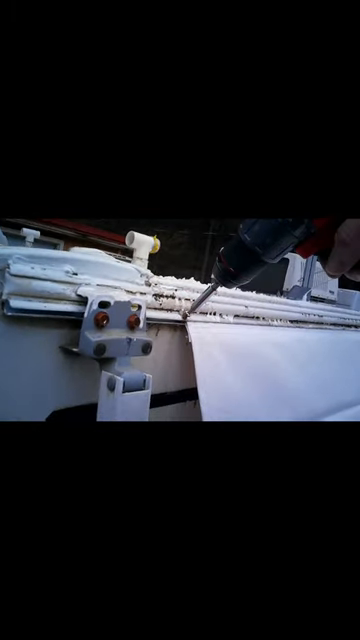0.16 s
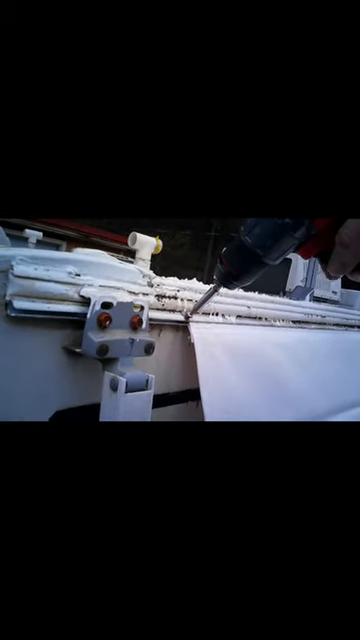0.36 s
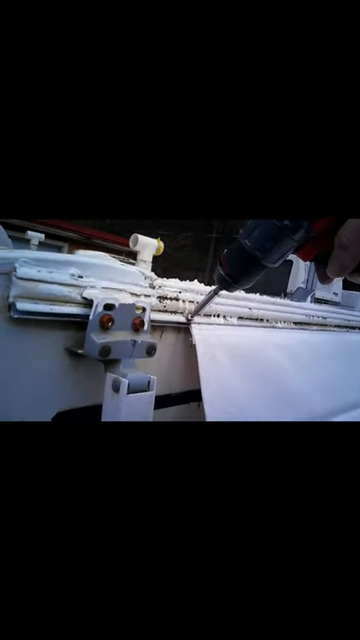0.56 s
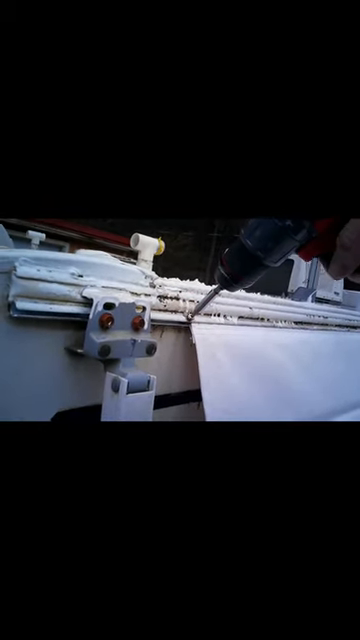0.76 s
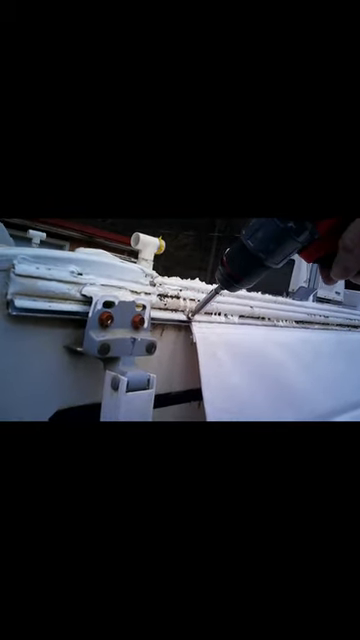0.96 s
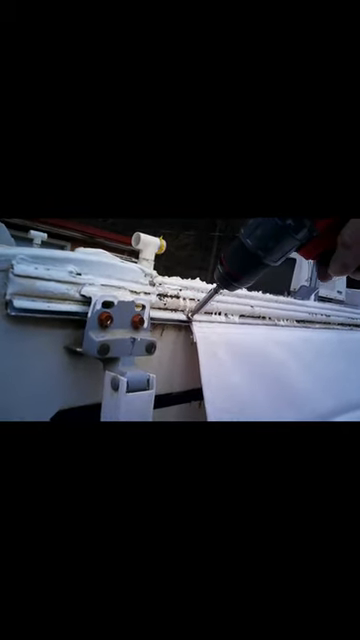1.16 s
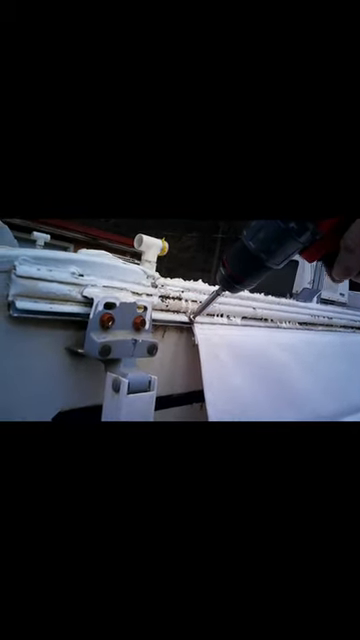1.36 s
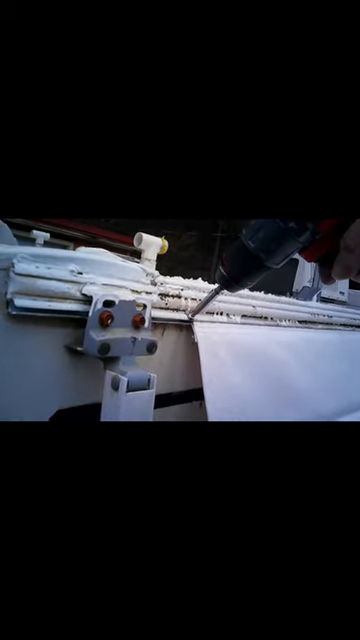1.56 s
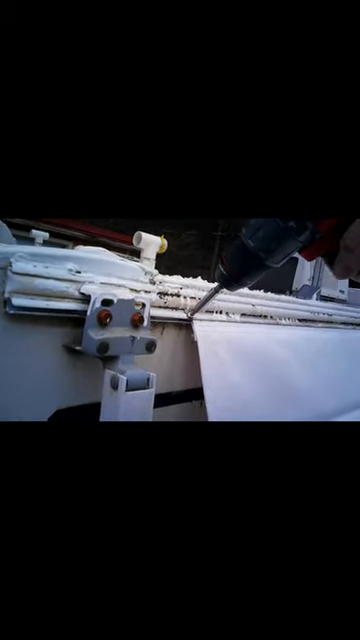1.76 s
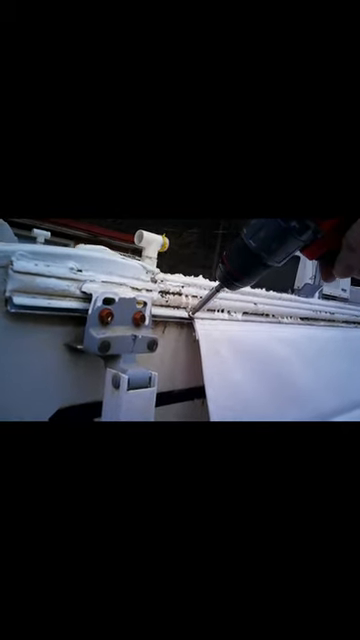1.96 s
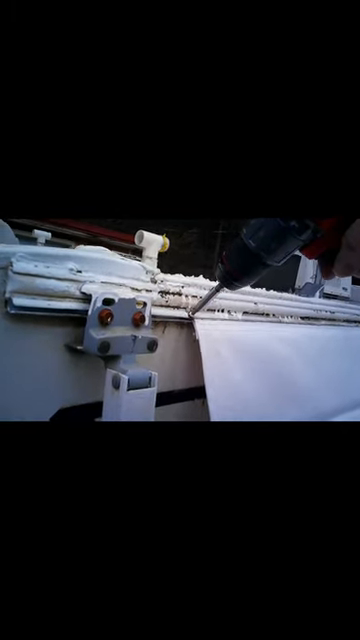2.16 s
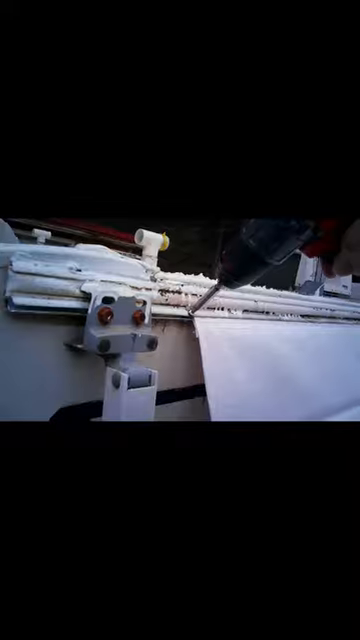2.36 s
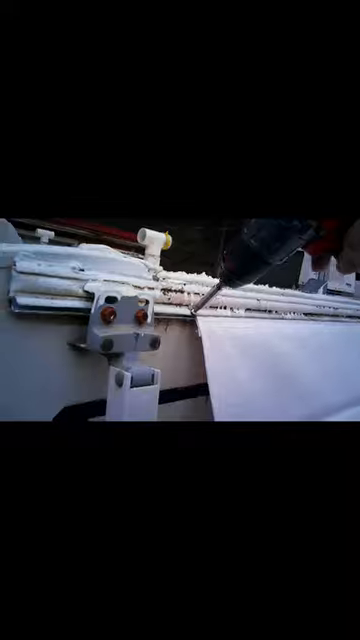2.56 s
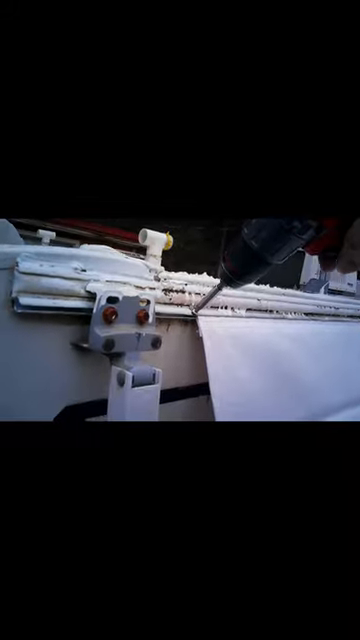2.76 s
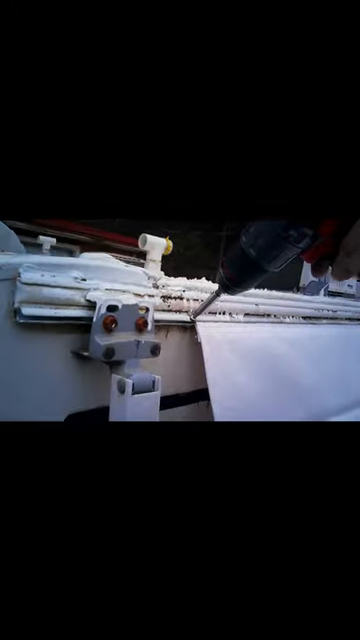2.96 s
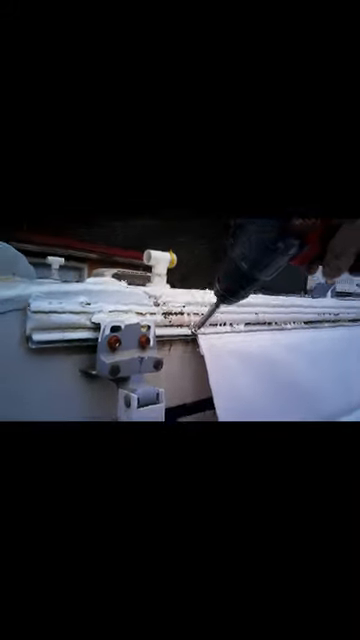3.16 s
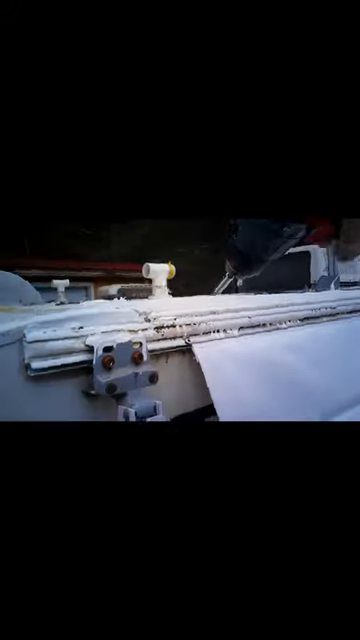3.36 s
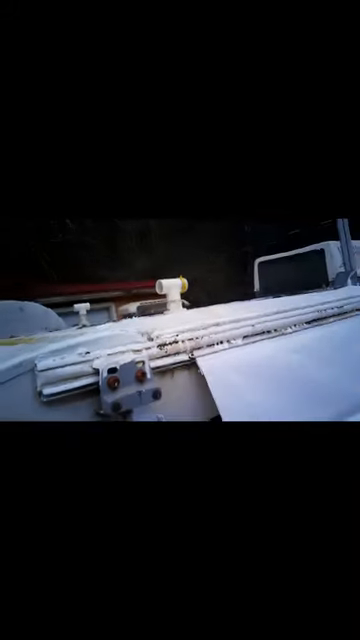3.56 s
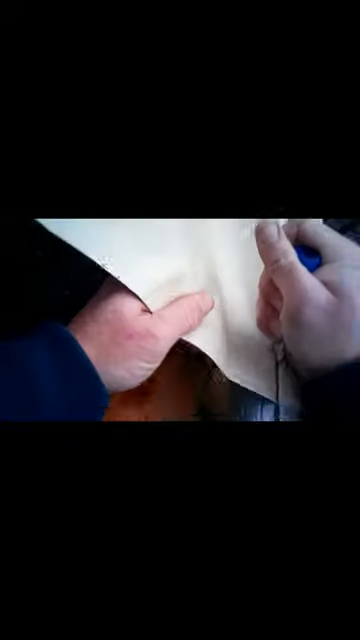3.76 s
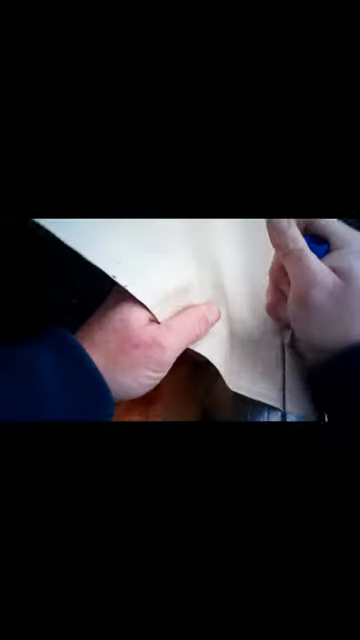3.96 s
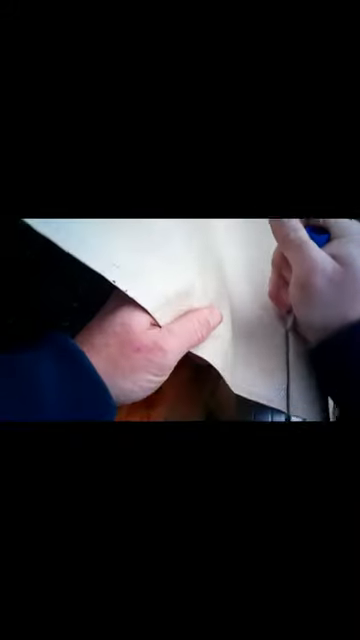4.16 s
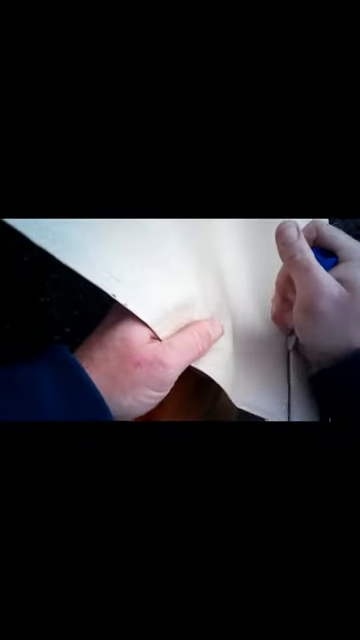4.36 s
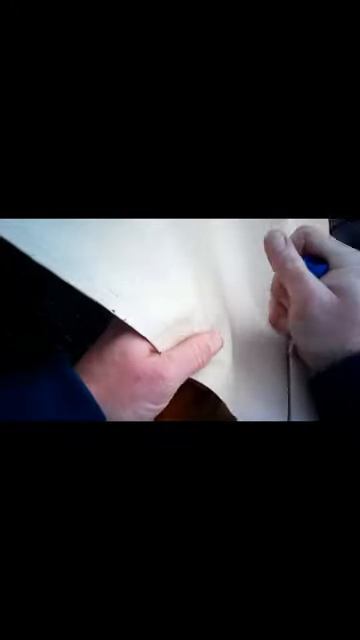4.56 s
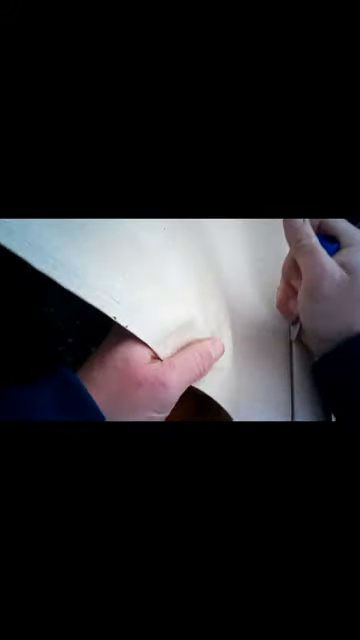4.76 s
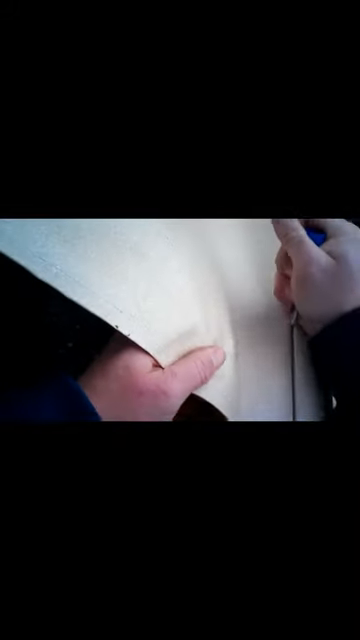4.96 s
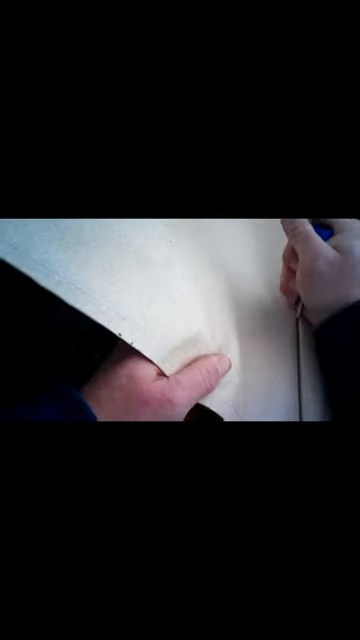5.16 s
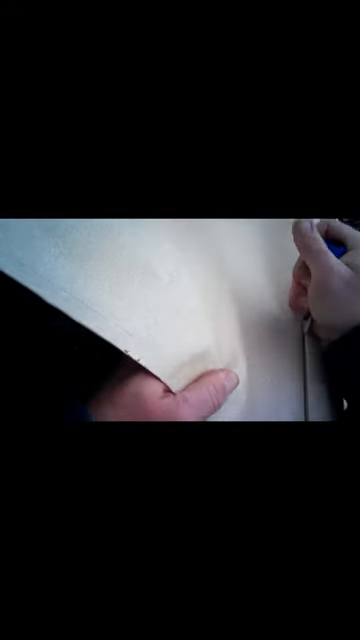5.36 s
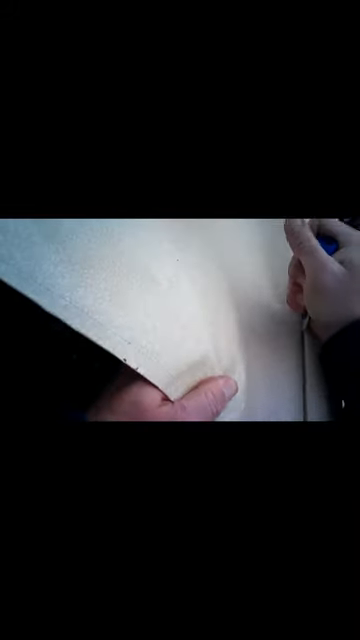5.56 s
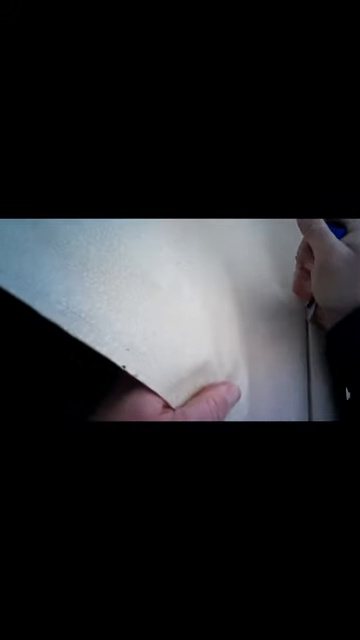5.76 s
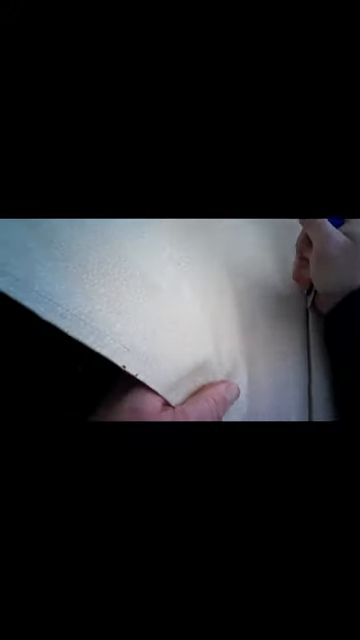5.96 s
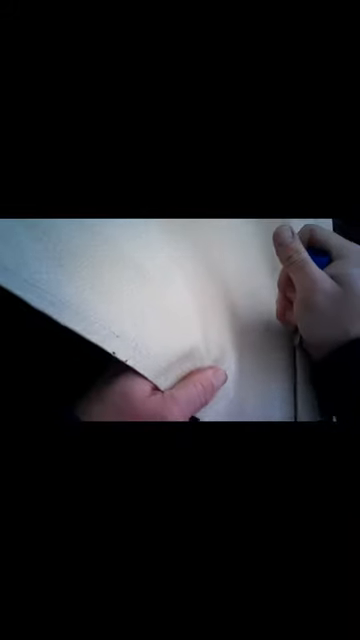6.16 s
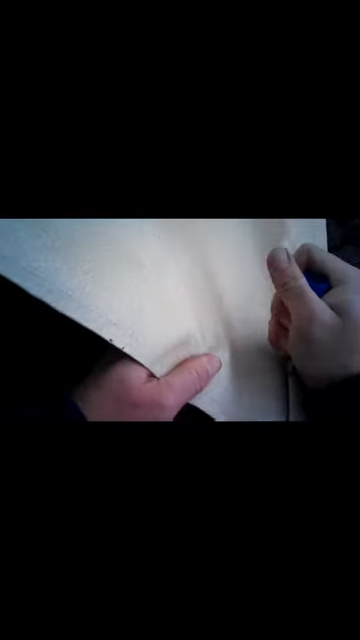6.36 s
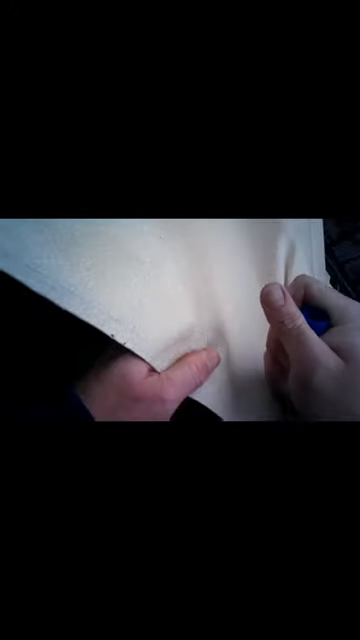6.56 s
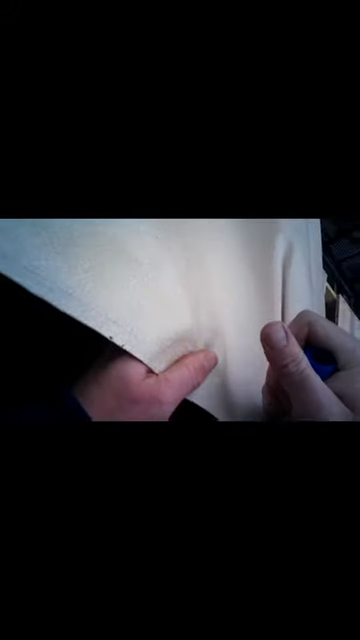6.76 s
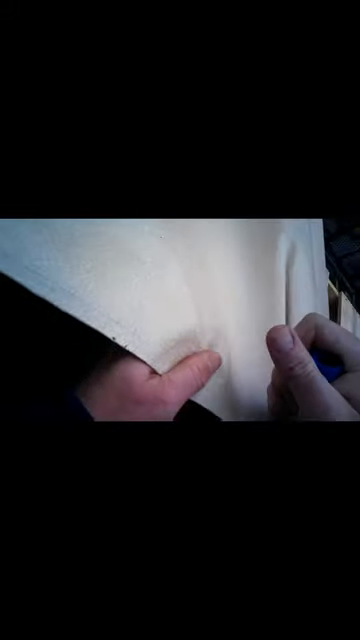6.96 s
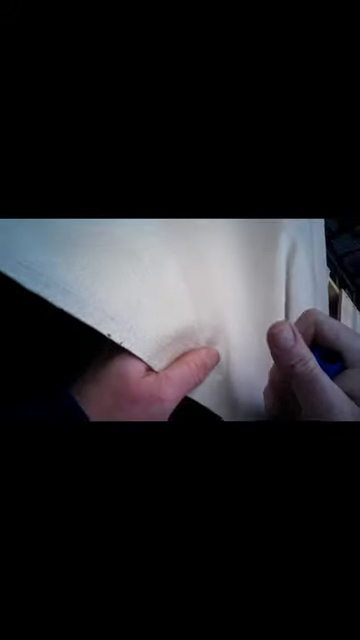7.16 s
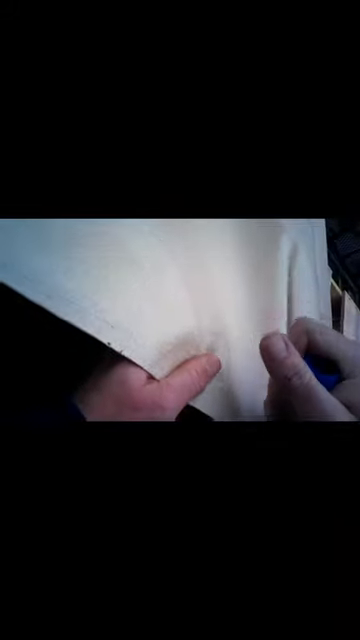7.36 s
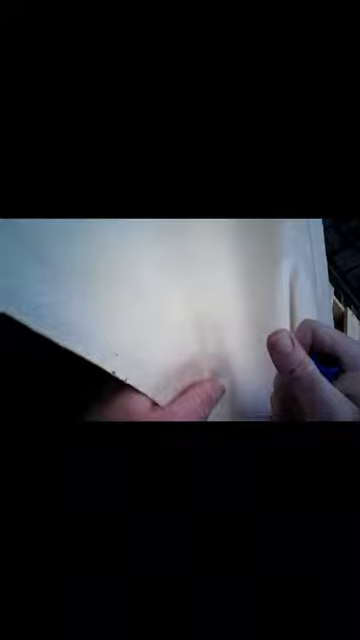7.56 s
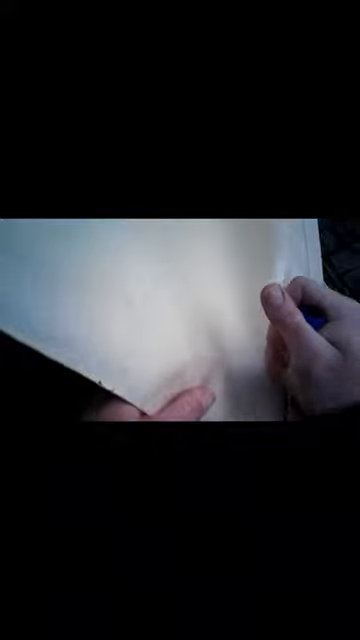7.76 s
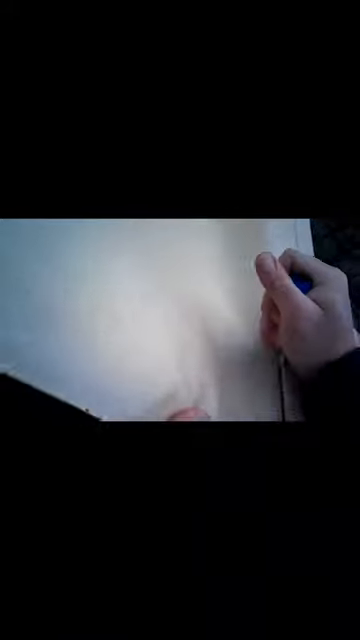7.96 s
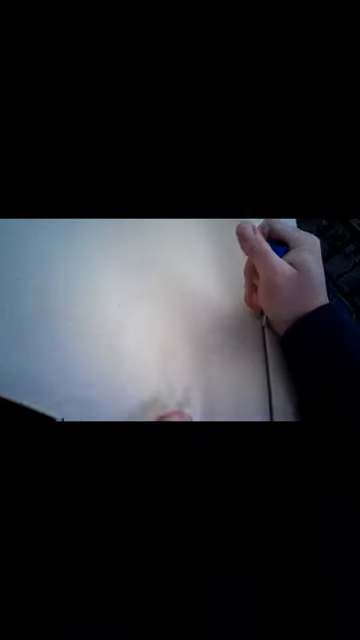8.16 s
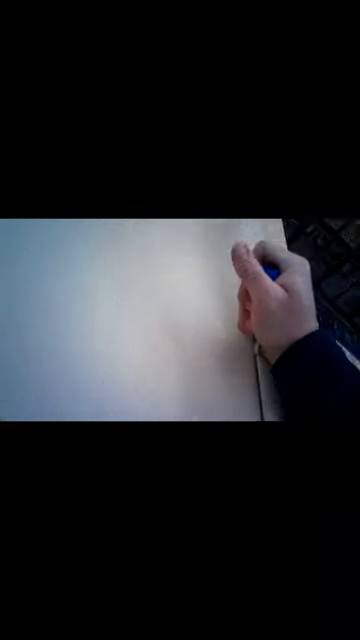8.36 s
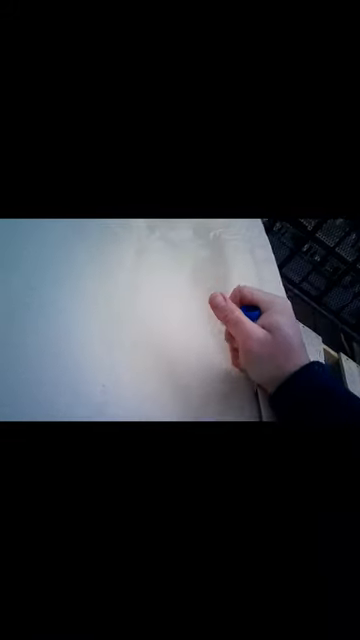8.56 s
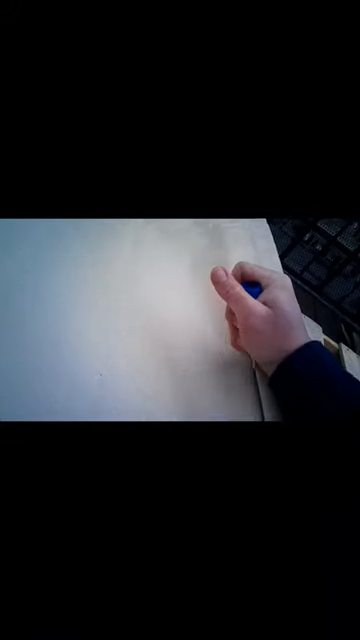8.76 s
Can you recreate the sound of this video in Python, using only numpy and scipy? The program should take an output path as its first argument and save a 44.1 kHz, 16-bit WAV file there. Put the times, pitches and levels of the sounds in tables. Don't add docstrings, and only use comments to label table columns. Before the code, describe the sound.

A cordless drill whines in eight short trigger bursts with hard clacks on a metal rail outdoors, then cord rubs and ticks on stiff canvas.

```python
import sys
import numpy as np
from scipy import signal
from scipy.fft import rfft, irfft
from scipy.io import wavfile
from scipy.ndimage import uniform_filter1d

SR = 44100
rng = np.random.default_rng(int(sys.argv[2]) if len(sys.argv) > 2 else 0)


def inscribe(sig):
    pcm = np.round(np.clip(np.atleast_2d(sig).T, -1, 1) * 32767)
    wavfile.write(sys.argv[1], SR, pcm.astype(np.int16))


def attenuation_scalar(level_db):
    decades = np.asarray(level_db, float) / 20
    return 10 ** decades


N = 388080
TIME = np.arange(N) / SR


def rms_one(x):
    return x / np.sqrt(np.mean(x ** 2) + 1e-20)


def in_time(tables, rest):
    rows = []
    for table in tables:
        rows += [(table[0][0] - .002, *rest), *table, (table[-1][0] + .004, *rest)]
    s, *columns = np.transpose(rows)
    return [np.interp(TIME, s, column) for column in columns]


def coloured(x, points):
    hz, level_db = np.transpose(points)
    grid = np.maximum(np.fft.rfftfreq(4096, 1 / SR), 1)
    log_gain = np.interp(np.log(grid), np.log(hz), level_db) * np.log(10) / 20
    cepstrum = irfft(log_gain)
    cepstrum[1:2048] *= 2
    cepstrum[2049:] = 0
    response = irfft(np.exp(rfft(cepstrum)))
    return signal.fftconvolve(x, response)[:N]


def band(x, low_hz, high_hz):
    return signal.sosfilt(signal.butter(2, [low_hz, high_hz], "band", fs=SR, output="sos"), x)


def resonance(x, hz, width_hz):
    r = np.exp(-np.pi * width_hz / SR)
    poles = [1, -2 * r * np.cos(2 * np.pi * hz / SR), r * r]
    return signal.lfilter([(1 - r * r) / 2, 0, (r * r - 1) / 2], poles, x)


def drift(rate_hz):
    r = np.exp(-16 * np.pi * rate_hz / SR)
    slow = signal.lfilter([1], [1, -2 * r, r * r], rng.standard_normal(N // 8 + 5002))
    slow = rms_one(slow[5000:])
    return np.interp(np.arange(N) / 8, np.arange(len(slow)), slow)


def tone(hz):
    return np.sqrt(2) * np.sin(2 * np.pi * np.cumsum(hz) / SR)


def add(out, s, level_db, decay_s, shape):
    i = round(s * SR)
    dying = attenuation_scalar(level_db) * shape * np.exp(-TIME[:len(shape)] / decay_s)
    out[i:i + len(shape)] += dying[:N - i]


REST_HZ, PASSING_HZ = 299, 4350
RUN_UP_BEND, COAST_BEND = 1.15, 1.4
STOP_S = .003
RATTLE_FOLLOWS = .4
# (stage, whine level [dB], rattle level [dB], whistle level [dB])
STAGES = [
    (0, -38, -50, -55),
    (.3, -37, -45, -47),
    (.5, -35, -39, -44),
    (1, -32, -30.5, -41.5),
    (1.55, -35, -30.5, -39),
    (2.01, -32.5, -29.5, -50),
    (3, -33, -28.5, -70),
]


def pull(start, passing, top, top_hz, effort_db, brake, brake_hz, coast_db):
    marks = [start, passing, top, brake + STOP_S]
    s = np.linspace(start, marks[-1], num=40)
    stage = np.interp(s, marks, range(4))
    rising_arch = (top_hz - PASSING_HZ) * (stage - 2) ** 2
    falling_arch = (top_hz - brake_hz) * np.abs(stage - 2) ** COAST_BEND
    arch = np.where(s > top, falling_arch, rising_arch)
    run_up_hz = REST_HZ + (PASSING_HZ - REST_HZ) * stage ** RUN_UP_BEND
    mesh_hz = np.where(s < passing, run_up_hz, top_hz - arch)
    at, *levels = np.transpose(STAGES)
    effort_db = effort_db * np.minimum(stage, 1)
    whine_db, rattle_db, switch_db = [np.interp(stage, at, db) + effort_db for db in levels]
    coast_db = coast_db * np.clip(stage - 2, 0, 1) ** .5
    return np.transpose([s, mesh_hz, whine_db + coast_db, rattle_db + RATTLE_FOLLOWS * coast_db, switch_db])


QUIET_S = 3
TAKE_UP_S, RUN_OUT_DB_S = .013, 950
# (start [s], passing speed [s], top speed [s], top gear mesh [Hz], effort [dB])
PULLS = [
    (0.011, 0.064, 0.099, 6123, 0.5),
    (.255, .31, 0.36, 5420, 0.5),
    (.51, .588, .648, 7169, 2.5),
    (0.919, 0.971, 1.0, 5900, -2),
    (1.224, 1.277, 1.307, 6190, -0.5),
    (1.552, 1.607, 1.642, 6447, 1),
    (1.927, 1.979, 2.01, 6470, 0),
    (2.45, 2.501, 2.5, 5506, -1),
]
# (time [s], peak level [dB], mesh left [Hz], rebound level [dB], coasting whine [dB])
BRAKES = [
    (.137, 0, 5700, -13, 0),
    (0.3954, -3, 5000, -13, -1),
    (.6933, 1, 5430, -21.5, 1),
    (1.0361, 0, 5000, -23.5, -1),
    (1.3437, -2, 5480, -21, -1),
    (1.6822, -11, 5500, -30, 0.5),
    (2.0466, -7, 5530, -30, 2.5),
    (2.5512, -14, 4630, -32, -9),
]


def drill_course():
    n = QUIET_S * SR
    courses = [pull(*p, b[0], b[2], b[4]) for p, b in zip(PULLS, BRAKES)]
    columns = in_time(courses, (REST_HZ, -120, -120, -120))
    mesh_hz, whine_db, rattle_db, switch_db = [column[:n] for column in columns]
    for start, *_ in PULLS:
        rattle_db[round((start - .01) * SR):round((start + TAKE_UP_S) * SR)] = -120
    run_out_db = RUN_OUT_DB_S * TIME[:n]
    rattle_db = np.maximum.accumulate(rattle_db + run_out_db) - run_out_db
    return mesh_hz, whine_db, rattle_db, switch_db


SHIELD_DB = -8
# (multiple of the top mesh, level [dB], mesh above which it sings [Hz],
# change when coasting [dB], frequency above which the housing shields it [Hz])
MESHES = [
    (1.001, 2.5, 4400, 1.5, 6750),
    (.675, 6, 4200, -8, 3950),
    (.535, 2, 4400, -.5, 6750),
    (.165, -1, 7200, 2, 6750),
    (.105, 0, 6800, 0, 6750),
    (.061, 1, 5000, 0, 340),
]


def gear_whine(mesh_hz):
    n = len(mesh_hz)
    coasting = uniform_filter1d(1. * (np.gradient(mesh_hz) < 0), 600)
    whine = 0
    for k, db, from_hz, coast_db, shield_hz in MESHES:
        sings = np.clip(mesh_hz / from_hz, 0, 1) ** 8
        wobble_db = 1.5 * drift(120)[:n]
        waver = .0015 * drift(150)[:n]
        shield_db = SHIELD_DB * np.clip((k * mesh_hz / shield_hz - 1) / .03, 0, 1)
        level_db = db + coast_db * coasting + wobble_db + shield_db
        whine = whine + sings * attenuation_scalar(level_db) * tone(k * mesh_hz * (1 + waver))
    return whine


def gear_rattle(mesh_hz, speed):
    n = len(mesh_hz)
    turn = 1 + .2 * tone(MESHES[-1][0] * mesh_hz)
    grit = rng.standard_normal(n) * turn * attenuation_scalar(2 * drift(400)[:n])
    low = band(grit, 29.99, 1900) * (speed ** 0.29 - 1)
    upper = band(grit, 4400, 9400) * (speed ** 1.1 - 1)
    top = band(grit, 7200, 18000) * (0.82 * speed ** 1.1 - 1)
    return grit + low + upper + top


SWITCH_HZ, SIDEBAND = 7850, 0.146


def speed_control_whistle(mesh_hz):
    offset = SIDEBAND * mesh_hz
    blur = drift(250)[:len(mesh_hz)]
    carrier = attenuation_scalar(-4) * tone(SWITCH_HZ + 0 * offset)
    lower = attenuation_scalar(-7.5) * tone(SWITCH_HZ - 0.63 * offset)
    return tone(SWITCH_HZ + offset) + blur * (carrier + lower)


REBOUND_S, REBOUND_LOSS_DB = .0235, 14
REBOUND_TOP_DB, BRAKE_TOP_DB = -9, -19
# (time [s], peak level [dB], share of top end [dB])
CLACKS = [(0.5178, -30, -10), (0.8694, -34, -8), (1.1717, -27, -7), (1.2343, -29, -13), (1.506, -29, -8),
          (1.5656, -28, -13), (1.8601, -38, -8), (1.8701, -25, -10), (1.9331, -29, -10), (2.301, -44, -7),
          (2.4021, -25, -10), (2.4081, -26, -10), (2.4586, -24, -12), (2.4687, -18, -16)]


def clacks():
    hits = [(s, db, BRAKE_TOP_DB) for s, db, *_ in BRAKES]
    for s, _, _, db, _ in BRAKES:
        for k in range(2):
            hits.append((s + REBOUND_S * (k + 1), db - REBOUND_LOSS_DB * k, REBOUND_TOP_DB))
    hits = hits + list(CLACKS)
    out = np.zeros(N)
    for (s, db, top_db), noise in zip(hits, rng.standard_normal((len(hits), 900))):
        dull = rms_one(band(noise, 340, 2000))
        body = rms_one(band(noise, 2495, 3500))
        bright = rms_one(band(noise, 5000, 9400)) + attenuation_scalar(-13) * rms_one(band(noise, 7000, 10000))
        broad = rms_one(band(noise, 1700, 6800))
        grit = attenuation_scalar(-13) * dull + body + attenuation_scalar(top_db + 4) * bright + attenuation_scalar(top_db + 12.5) * broad
        add(out, s, db - 8.5, .0035, grit / np.abs(grit[:130]).max())
    return band(out, 300, 7700)


# (time [s], peak level [dB])
JAMS = [
    (.3495, -12),
    (1.3125, -12),
    (1.6555, -6),
    (2.0175, -4),
    (2.5195, -6),
]


def jams():
    out = np.zeros(N)
    snap = band(band(signal.unit_impulse(400), 1800, 4600), 2000, 4200)
    for s, db in JAMS:
        add(out, s, db, .004, snap / np.abs(snap).max())
    return out


STANDING_DRIVE_DB = -3.5
# (frequency [Hz], level [dB per Hz])
HOUSING = [(70, -68), (150, -37.5), (800, -25.5), (1720, -21), (2500, -9.5), (3300, -13), (4000, -16.5),
           (4760, -21), (6500, -22), (7200, -27), (9500, -30.5), (11800, -49), (13500, -38), (15500, -55)]
# (frequency [Hz], width [Hz], level [dB])
RINGS = [
    (2920, 86, 14),
    (3150, 56, -0.5),
    (3830, 150, 3.5),
    (6310, 500, 2.5),
]


def drill():
    mesh_hz, whine_db, rattle_db, switch_db = drill_course()
    n = len(mesh_hz)
    speed = np.clip(signal.lfilter([.003], [1, -.997], mesh_hz) / 6000, .1, 2)
    struck = coloured(attenuation_scalar(whine_db + 13.5) * gear_whine(mesh_hz), HOUSING)[:n]
    rattle = coloured(attenuation_scalar(rattle_db + 25.5) * gear_rattle(mesh_hz, speed), HOUSING)[:n]
    knocks = (clacks() + jams())[:n]
    standing = uniform_filter1d(1. * (whine_db < -100), 300)
    standing_db = STANDING_DRIVE_DB * standing
    drive = struck + attenuation_scalar(-7.5 + standing_db) * rattle / speed ** 0.13 + attenuation_scalar(-9.5 + standing_db) * knocks
    rings = sum(attenuation_scalar(db) * resonance(drive, hz, max(width, 60)) for hz, width, db in RINGS)
    tool = struck + knocks + rattle + attenuation_scalar(switch_db) * speed_control_whistle(mesh_hz)
    return np.pad([tool, rings], ((0, 0), (0, N - n)))


YARD_T60_S, YARD_DB = 0.22, -25


def yard(x):
    s = TIME[:SR // 2]
    tail = rng.standard_normal(SR // 2) * attenuation_scalar(-60 * s / YARD_T60_S) * (s > .012)
    tail = band(tail, 597, 4600)
    return attenuation_scalar(YARD_DB) * signal.fftconvolve(x, tail / np.sqrt(np.sum(tail ** 2)))[:N]


EDGE_DB, EDGE_BEND, CREST_DB = 13, 4.0, 8


def stroke(start, strongest, end, level_db, centre_hz):
    s = np.linspace(start + .003, end - .005, num=15)
    away = np.abs(np.interp(s, [start, strongest, end], [-1, 0, 1]))
    swell_db = level_db - 1.5 - CREST_DB * away - EDGE_DB * away ** EDGE_BEND
    return np.transpose([s, swell_db, centre_hz + 0 * s])


CRACKLES_PER_S, CRACKLE_DB = 78, 8
DRAG_BRIGHT_DB, STROKE_DULL_DB = 2.5, -1.5
BRIGHT_WITH_LEVEL = .3
# (start [s], strongest [s], end [s], level [dB], centre [Hz])
STROKES = [(4.136, 4.171, 4.266, -49, 2696), (4.264, 4.323, 4.36, -54.5, 2950),
           (4.382, 4.482, 4.515, -46, 2795), (4.52, 4.547, 4.635, -51, 3470),
           (4.641, 4.71, 4.795, -48, 3100), (4.801, 4.843, 4.885, -48, 3350),
           (4.897, 4.94, 5.025, -46.5, 2720), (5.035, 5.06, 5.15, -54.5, 2900),
           (5.149, 5.208, 5.275, -46, 2900), (5.284, 5.307, 5.4, -50, 3000),
           (5.396, 5.46, 5.535, -44, 3700), (5.535, 5.597, 5.63, -52, 3290),
           (5.638, 5.687, 5.81, -52, 2880), (5.8, 5.818, 5.87, -58, 2700),
           (5.897, 5.956, 6.04, -50.5, 2640), (6.036, 6.085, 6.12, -57.5, 2750),
           (6.136, 6.195, 6.25, -51.5, 2700), (7.07, 7.133, 7.165, -58.5, 2970),
           (7.263, 7.319, 7.36, -55, 3150), (7.39, 7.414, 7.47, -60, 2950),
           (7.526, 7.559, 7.62, -51.5, 3350), (7.617, 7.628, 7.75, -53, 3310),
           (8.59, 8.747, 8.81, -57, 2477)]
# (time [s], level [dB], centre [Hz])
DRAGS = [
    [(6.265, -64, 3630), (6.309, -51.5, 3020), (6.467, -50, 3062), (6.527, -55.5, 3040), (6.603, -47, 3510),
     (6.635, -52, 3280), (6.799, -53, 3800), (6.995, -53.5, 2634), (7.075, -66, 3176)],
    [(7.765, -70, 3017), (7.799, -56, 3300), (7.885, -62.5, 3090), (8.005, -49, 3700), (8.083, -46.5, 3030),
     (8.179, -46.5, 2760), (8.203, -53, 2775), (8.543, -53.5, 2680), (8.585, -73, 2430)],
]
# (frequency [Hz], level [dB per Hz])
CANVAS = [(250, -12.5), (900, -9), (1400, -10), (1900, -2), (2500, -1.5), (4200, -1), (4700, -6),
          (6600, -13), (7200, -22), (8400, -23.5), (9300, -16.5), (10800, -18), (11800, -31),
          (15000, -47.5)]


def rubbing():
    next_starts = [row[0] for row in STROKES[1:]] + [N / SR]
    ends = np.minimum([row[2] for row in STROKES], next_starts)
    short = [stroke(start, strongest, end, db, hz) for (start, strongest, _, db, hz), end in zip(STROKES, ends)]
    moves = sorted(short + list(DRAGS), key=lambda t: t[0][0])
    rub_db, centre_hz = in_time(moves, (-72, 3000))
    dragging = sum((TIME > t[0][0]) & (TIME < t[-1][0]) for t in DRAGS)
    tilt_db = np.where(dragging, DRAG_BRIGHT_DB + BRIGHT_WITH_LEVEL * (rub_db + 50), STROKE_DULL_DB)
    slips = rng.standard_normal((2, N)) * attenuation_scalar(1.96 * drift(250))
    snapping = rng.random(N) < CRACKLES_PER_S / SR
    slips = slips + attenuation_scalar(CRACKLE_DB) * rng.laplace(size=N) * snapping
    edges = 250 * 2 ** np.arange(0, 5.6, .33)
    out = 0
    for k, (low, high) in enumerate(zip(edges, edges[1:])):
        near = np.exp(-(np.log2(centre_hz / np.sqrt(low * high)) / .35) ** 2)
        above_db = tilt_db * max(np.log2(low / 3500), 0)
        out = out + attenuation_scalar(1.9 * drift(14) + 3.5 * near + above_db) * band(slips[k % 2], low, high)
    return attenuation_scalar(rub_db) * rms_one(coloured(out, CANVAS))


# (time [s], peak level [dB])
TICKS = [(3.2902, -37), (3.4146, -46.5), (3.717, -45.5), (3.876, -46), (4.114, -38), (4.197, -33),
         (4.469, -31), (4.533, -33), (4.591, -37), (4.616, -45), (4.712, -34), (4.8984, -35), (4.9719, -33),
         (5.047, -41), (5.1126, -35.5), (5.2253, -41), (5.2987, -36), (5.457, -29), (5.464, -28),
         (5.5069, -30.5), (5.5972, -40), (6.0498, -40), (6.2778, -36), (6.4575, -39), (6.5797, -35),
         (6.6004, -35.5), (6.818, -35), (7.5716, -32), (7.6316, -34), (7.9999, -39)]


def ticks():
    out = np.zeros(N)
    pitch_hz = 3500 * 2 ** rng.normal(0, .12, len(TICKS))
    for (s, db), hz in zip(TICKS, pitch_hz):
        snap = band(band(signal.unit_impulse(300), hz * .5, hz * 1.5), hz * .5, hz * 1.5)
        add(out, s, db + 0.5, .003, snap / snap.max())
    return out


# (time [s], peak level [dB], centre [Hz])
THUDS = [
    (3.101, -41.5, 528),
    (3.115, -36, 510),
    (3.139, -41, 546),
    (3.213, -39, 263),
    (3.494, -42, 795),
    (4.46, -39.5, 1110),
    (5.459, -41, 880),
    (6.884, -35, 410),
]


def thuds():
    out = np.zeros(N)
    for (s, db, hz), noise in zip(THUDS, rng.standard_normal((len(THUDS), 2000))):
        add(out, s, db - 9.5, .012, rms_one(band(noise, hz * 0.4, hz * 2.0)))
    return out


# (start [s], length [s], from [Hz], to [Hz], level [dB])
BIRD = [
    (2.585, .035, 7850, 7400, -67),
    (3.175, 0.025, 7320, 7320, -74.5),
    (3.34, 0.0496, 7240, 8100, -71),
]


def bird():
    out = 0
    for s, length, from_hz, to_hz, db in BIRD:
        part = np.clip((TIME - s) / length, 0, 1)
        out = out + attenuation_scalar(db) * np.sin(np.pi * part) * tone(from_hz + (to_hz - from_hz) * part)
    return out


AIR_DB, RUMBLE_DB = -3.5, -16.5
# (time [s], level [dB])
TRAFFIC = [(0.0, -50), (0.56, -50.5), (0.76, -54), (1.39, -51), (2.99, -58.5), (6.72, -58), (7.3, -61.5),
           (8.02, -60), (8.28, -57), (8.8, -57)]
# (frequency [Hz], level [dB per Hz])
AIR = [(76, -44), (130, -9.5), (291, -9), (500, -9.5), (849, -8), (1150, -12), (1950, -13.5), (2650, -12),
       (3600, -33.5), (4680, -62.5), (7920, -120)]


def traffic():
    level_db, = in_time([TRAFFIC], (-62,))
    roar = rms_one(coloured(rng.standard_normal(N), AIR))
    rumble = rms_one(band(rng.standard_normal(N), 45, 129.94))
    return attenuation_scalar(level_db + AIR_DB) * roar + attenuation_scalar(level_db + RUMBLE_DB) * rumble


HISS_DB = -64
# (frequency [Hz], level [dB per Hz])
HISS = [(20, 0.5), (60, -4), (300, -5.5), (3500, -20.5), (12000, -21), (15600, -26)]


def hiss():
    return attenuation_scalar(HISS_DB) * rms_one(coloured(rng.standard_normal(N), HISS))


RING_OUT_DB = -4


def scene():
    tool, rings = drill()
    reflected = yard(tool + attenuation_scalar(RING_OUT_DB) * rings)
    work = rubbing() + ticks() + thuds()
    background = bird() + traffic() + hiss()
    return (tool + rings + reflected + work + background)[None]


def top_cut(x):
    return signal.sosfilt(signal.butter(12, 15710, fs=SR, output="sos"), x)


def record(dry):
    return top_cut(dry)


dry = scene()
out = record(dry)
inscribe(out)
```